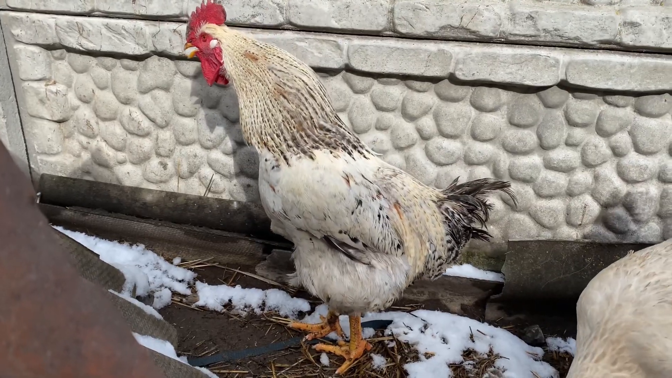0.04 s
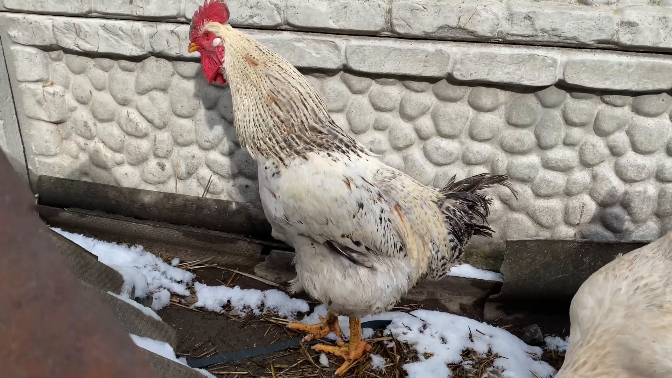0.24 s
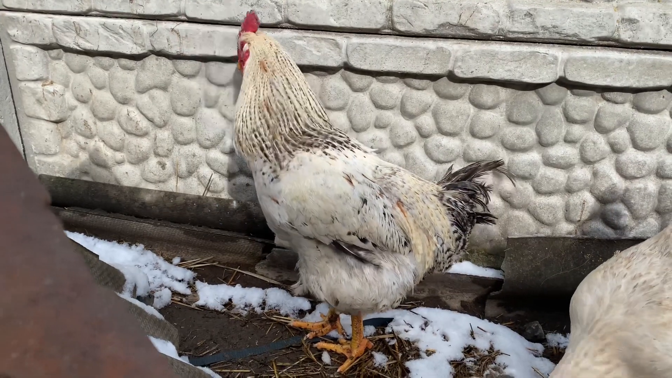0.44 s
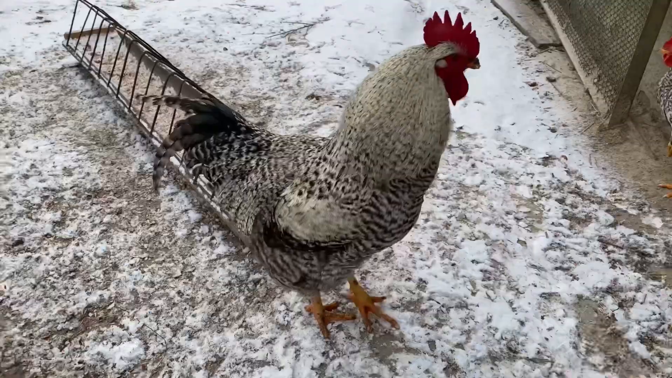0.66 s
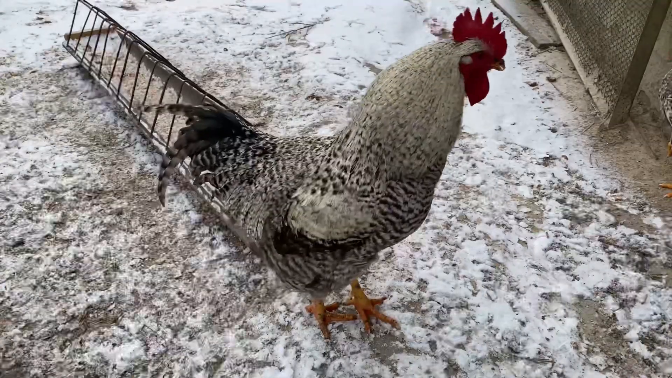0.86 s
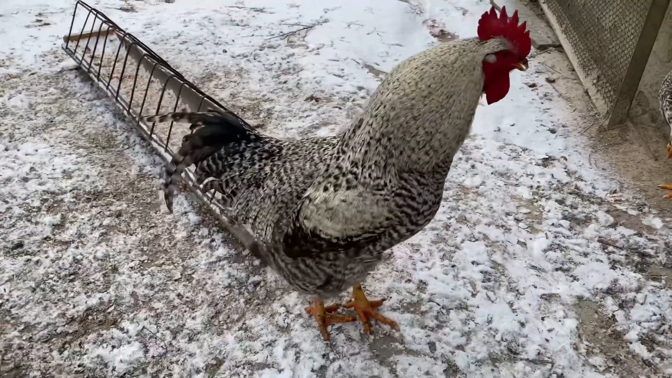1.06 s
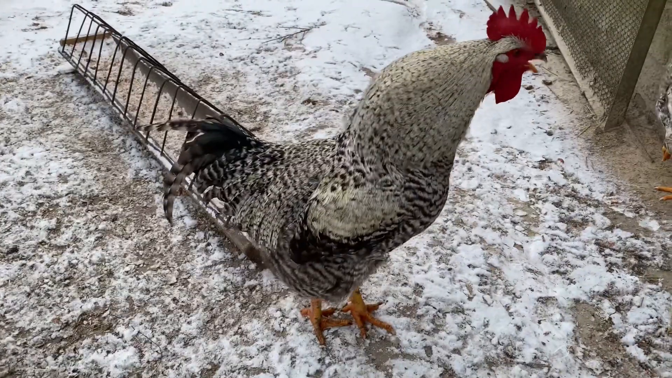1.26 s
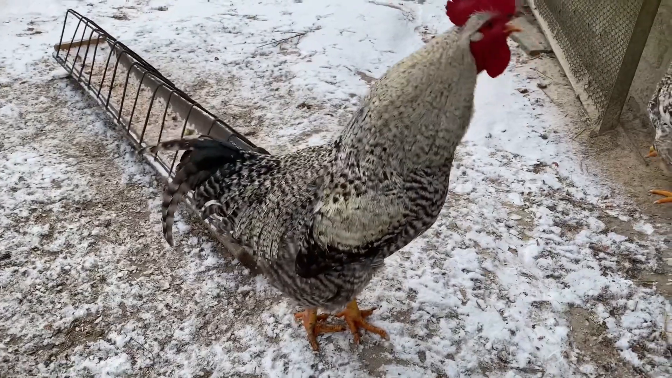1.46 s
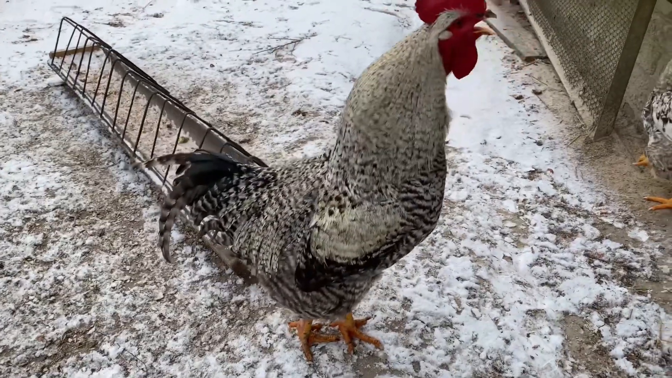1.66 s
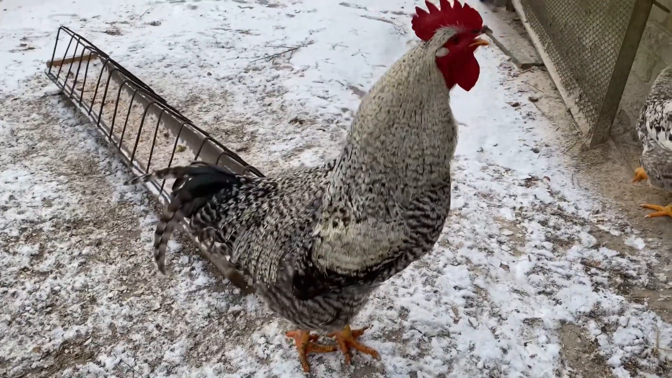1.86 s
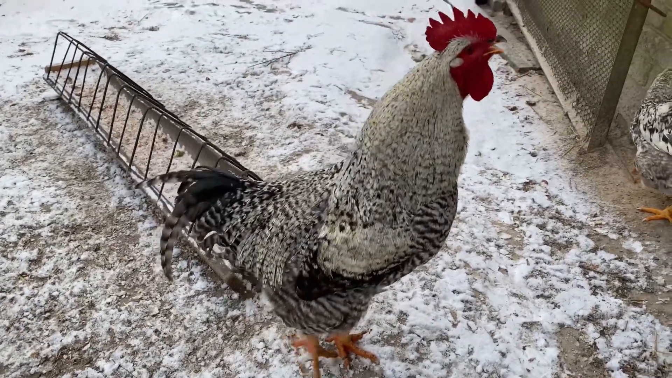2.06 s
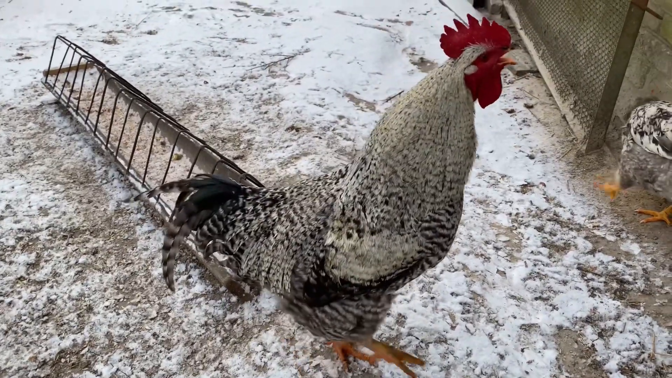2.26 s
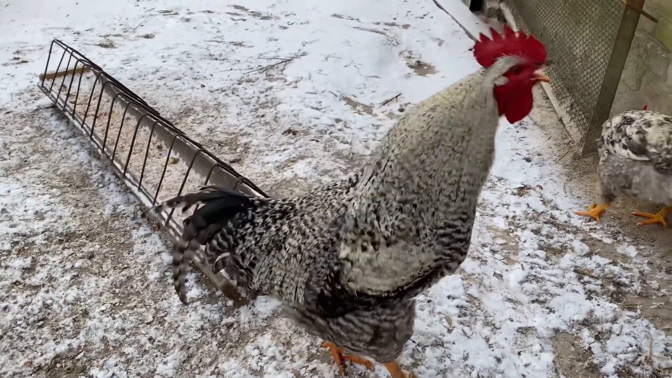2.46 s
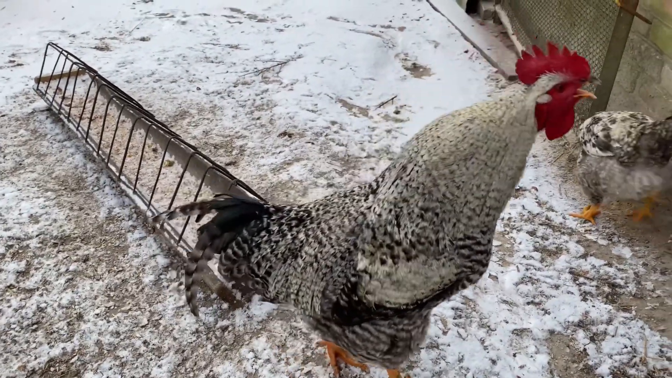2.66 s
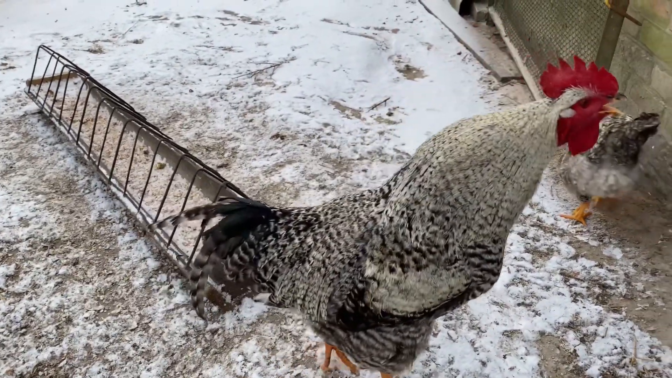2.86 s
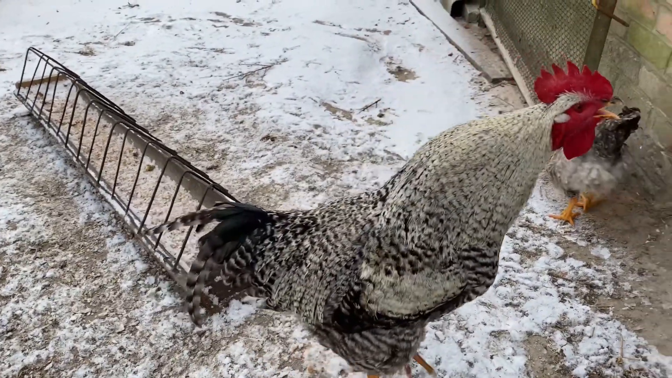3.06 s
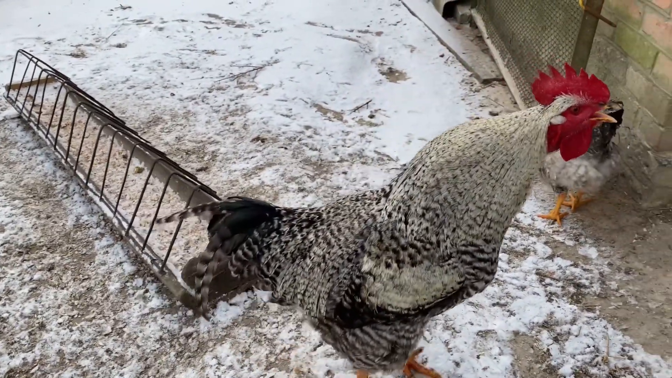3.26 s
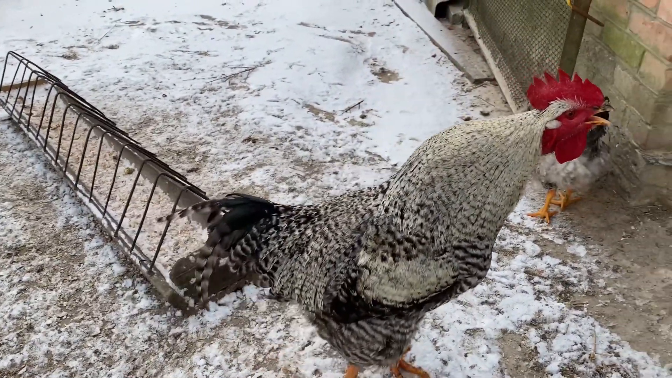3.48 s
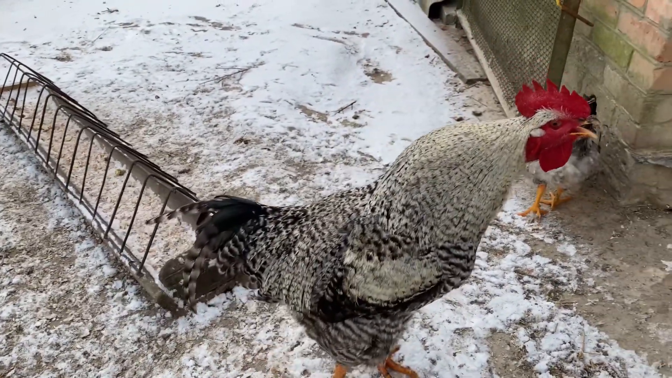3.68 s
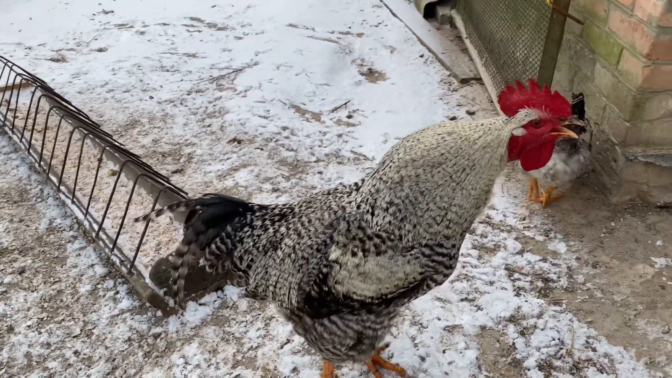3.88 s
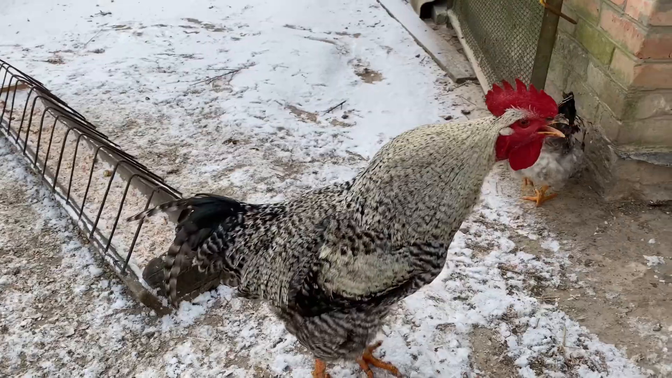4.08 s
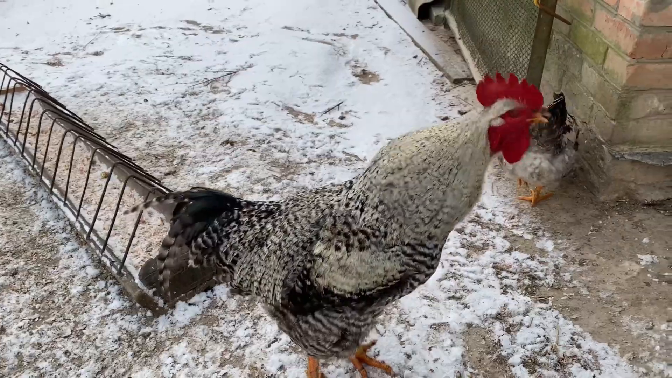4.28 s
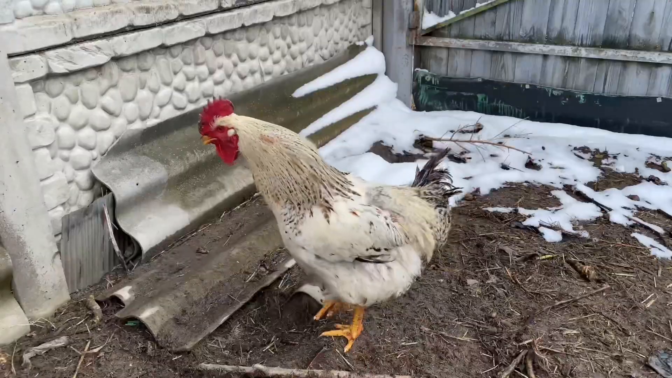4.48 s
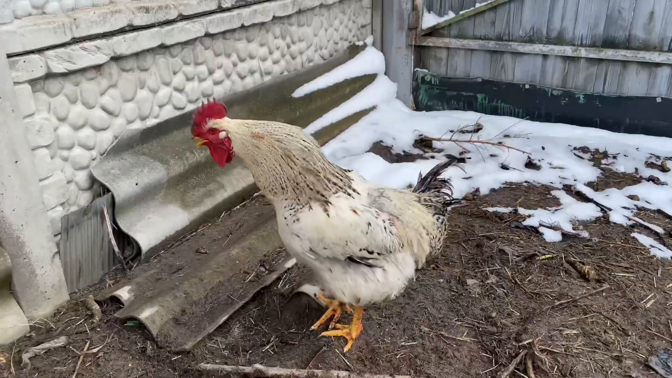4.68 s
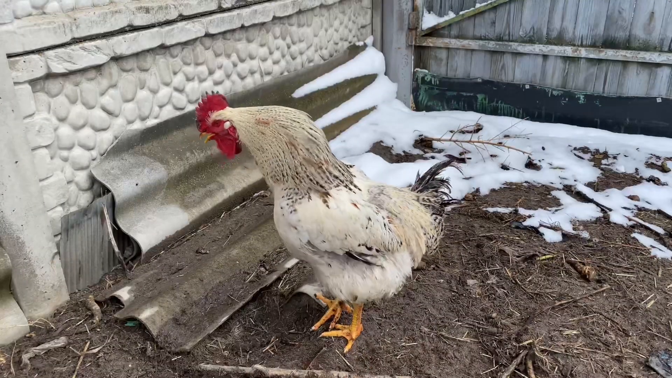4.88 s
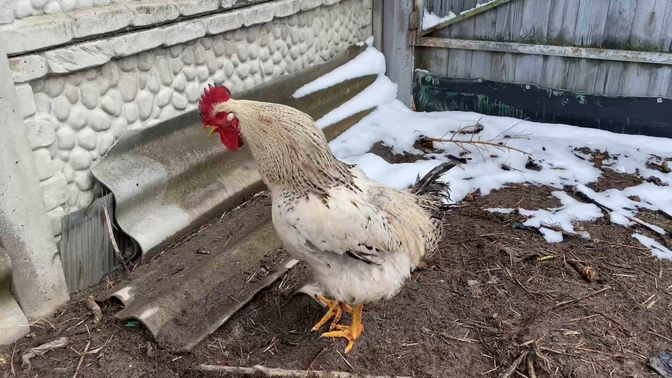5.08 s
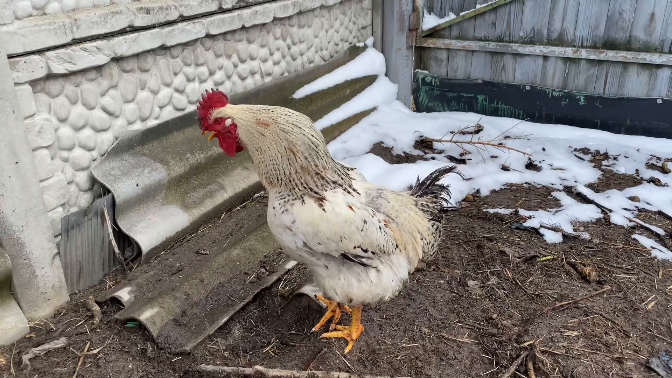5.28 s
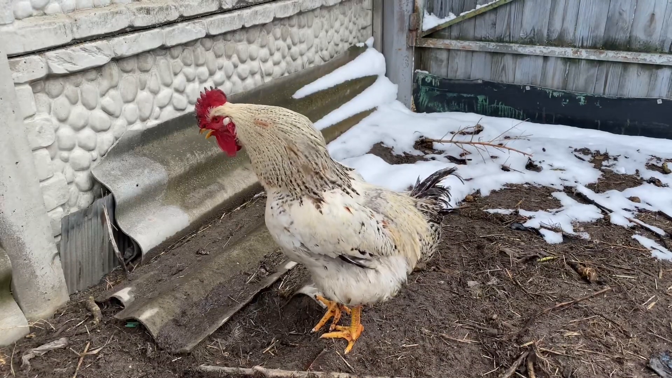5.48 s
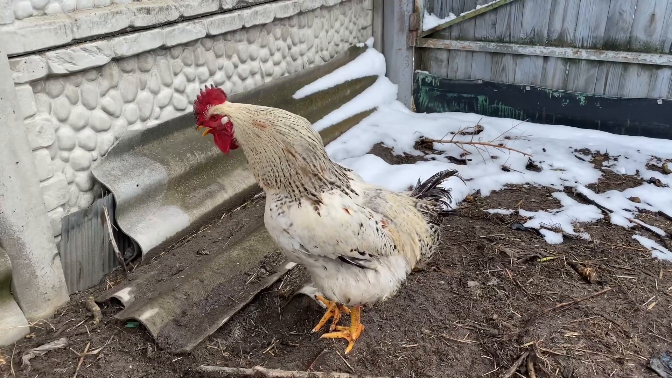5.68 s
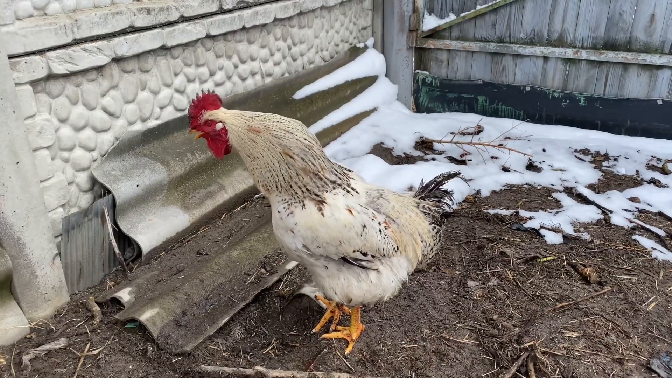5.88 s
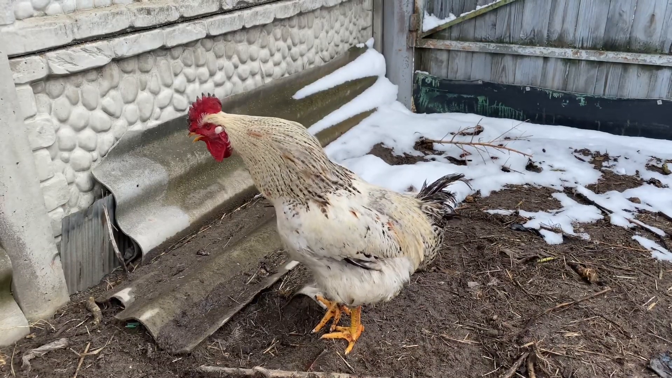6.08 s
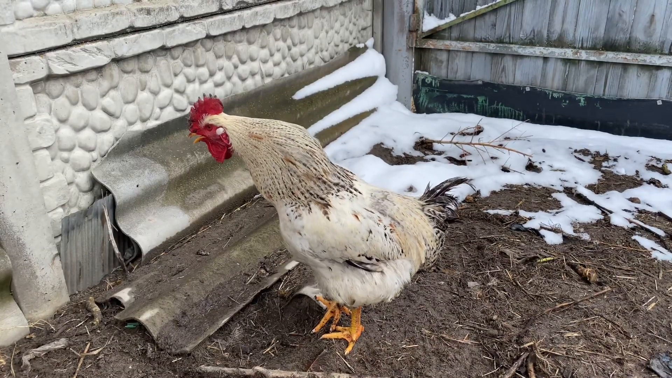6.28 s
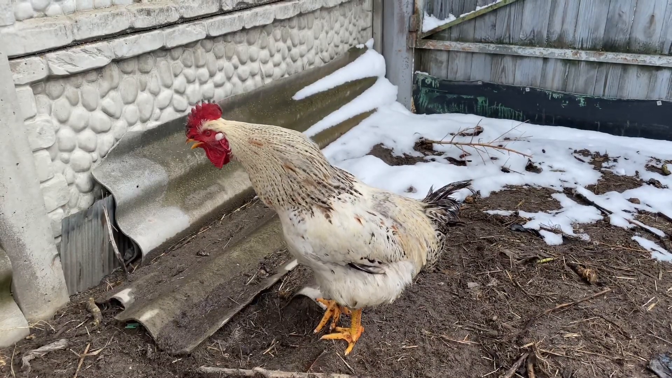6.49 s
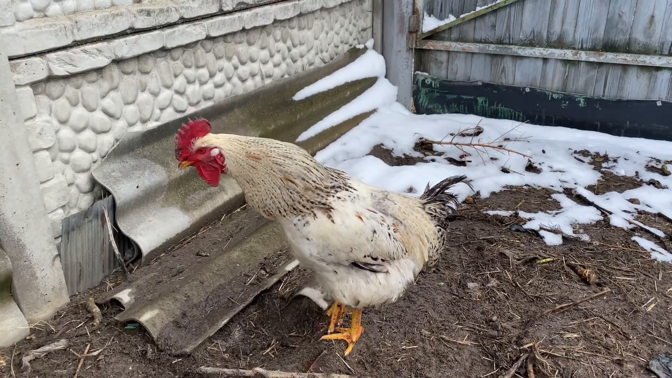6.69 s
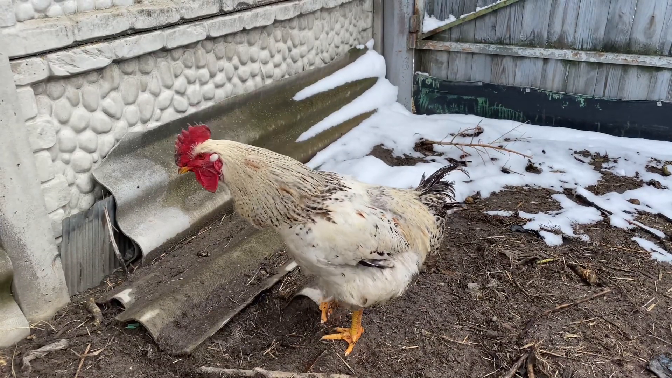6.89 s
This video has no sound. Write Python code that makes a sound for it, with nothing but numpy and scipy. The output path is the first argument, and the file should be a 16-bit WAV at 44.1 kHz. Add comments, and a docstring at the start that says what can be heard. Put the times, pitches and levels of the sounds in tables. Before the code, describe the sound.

Roosters crow in turn in a quiet snowy yard: a harsh fragment, a clear drawn-out crow that cracks lower, then a rough, broken, rasping crow.

```python
"""The rasping end of a white rooster's crow opens a snowy yard; a grey one then clucks twice and crows, its
long clear note sinking and cracking, and a white one answers with a hoarse, stuttering crow.
Each voice is a source-filter model: a pulse train and hiss from the syrinx, throat resonances, and levels
set in three bands. Echoes are scattered decaying impulses; claw scratches, the breeze rumbling on the
microphone and the hush of the village are coloured noise."""
import sys
import numpy as np
from scipy import signal
from scipy.fft import rfft, irfft, next_fast_len
from scipy.io import wavfile
from scipy.ndimage import uniform_filter1d

SR = 44100
rng = np.random.default_rng(int(sys.argv[2]) if len(sys.argv) > 2 else 0)


def store_wav(level_fs):
    """Save 16-bit WAV to argv[1]."""
    pcm = np.round(np.clip(np.atleast_2d(level_fs), -1, 1) * 32767)
    wavfile.write(sys.argv[1], SR, pcm.T.astype(np.int16))


N = 306054
TIME = np.arange(N) / SR
SIZE = next_fast_len(N + SR)   # room for the echo tail
FREQS = np.maximum(np.arange(SIZE // 2 + 1) * SR / SIZE, 1)

# the treble differs between left and right alike for every bird: (frequency [Hz], phase lead of left [rad],
# left over right [dB])
TREBLE_CHANNELS = [(8680, 4, 0.17), (10200, -0.5, 0.014), (11700, 1.5, 0.0057), (13000, -2.5, 0.23)]


def white_rooster():
    """Source-filter voice: a strongly uneven syrinx drives the throat of a hoarse bird next to a stone wall."""
    # (start [s], end [s], first pitch [Hz], last pitch [Hz], chest [dB], ring [dB], edge [dB],
    #  rasp [0-1], alternation of strong and weak beats [0-1])
    notes = [(.005, .118, 545.8, 563.7, -19.5, -22, -30, .42, .55),
             (.118, .222, 593.5, 519.7, -27.5, -29.5, -38.5, .15, .1),
             (4.645, 4.72, 527.9, 530.3, -24.5, -24, -39, .7, 0.35),
             (4.72, 4.89, 513.3, 444.3, -36, -30.5, -40.5, .25, 0.04),
             (5.058, 5.18, 544.4, 520.8, -23.5, -26, -36.5, .25, 0),
             (5.18, 5.232, 455.7, 439, -41, -35, -45, .6, .1),
             (5.232, 5.648, 468.2, 538.8, -33.5, -29.5, -40, .75, 0.11),
             (5.648, 5.86, 577.7, 541.6, -20.5, -21, -33, .85, 0.14),
             (5.86, 6.572, 545.7, 544.7, -19.5, -20, -32.5, .58, 0.46),
             (6.572, 6.668, 597, 523.5, -22.5, -29, -35.5, 0.1, 0)]
    # momentary pulls of the voice, mostly booming on the windpipe's resonance:
    # (crest [s], rise [s], fall [s], pitch [Hz], chest [dB], ring [dB], edge [dB], rasp [0-1])
    surges = [(.17, 0.01, .016, 564.6, -18, -39, -37.5, .05),
              (4.746, .06, .03, 539.3, -20, -32.5, -34, 0.3), (5.113, .03, .031, 619.7, -9, -24, -36.5, .2),
              (5.327, .042, .022, 594.1, -13.5, -23, -34.5, 0.1),
              (5.448, .032, .044, 643.3, -11.5, -22.5, -33, .27),
              (5.568, .022, .03, 634.7, -10.5, -22.5, -33, .2),
              (5.661, .012, 0.016, 586.3, -13, -22, -35.5, .25),
              (5.806, .048, .05, 501.7, -24, -33, -36, 0.01),
              (6.611, .025, 0.022, 594.3, -16.5, -25.5, -34, 0)]
    # resonances of windpipe and beak, neck relaxed: (frequency [Hz], width at -6 dB [Hz], level [dB])
    relaxed = [(628, 182, 18.5), (1200, 1300, -4), (1747, 460, -6), (3940, 800, -38.5), (4714, 530, -3),
               (6300, 1000, -14), (10400, 1400, -21.5)]
    # the same with the neck stretched: (frequency [Hz], width at -6 dB [Hz], level [dB])
    stretched = [(622, 190, -8), (853, 84, -3.5), (1275.5, 48, 12.5), (1640, 340, -17.5), (2560, 138, -6),
                 (3500, 540, -17), (5260, 730, -22), (6320, 130, -22), (8690, 1300, -28.5),
                 (9600, 4100, -33)]
    # reach of the neck: (time [s], stretch [0-1], resonance frequency ratio)
    neck = [(0, 0.98, 0.978), (.25, 1, 0.951), (4.638, .95, 1.04), (4.879, .9, 1.02), (5.061, .25, 1.041),
            (5.74, 0, 1.013), (5.87, 0.98, 1.01), (6.42, 0.99, 0.994), (6.66, 0.99, 0.92)]
    # how the ports hear this bird: (frequency [Hz], phase lead of left [rad], left over right [dB])
    ports = [(100, 1.3, -0.5), (630, 0.4, 1), (1262, 1.57, 7.5), (1760, 2.1, -3.5), (3020, 4.2, 10.5),
             (3030, 6.22, 0), (4470, 1.96, 5.5), (5230, 2.1, 4), (6980, 0.97, 0.5)]

    pitch, force_db, rasp, alternation = perform(notes, surges)
    source = syrinx(pitch, rasp, alternation, jitter=0.078, jitter_hz=129.7, shimmer_db=5.0,
                    hiss_db=4.0, waver=0.0046, wobble=.018)
    voice = throat(source, relaxed, stretched, neck, low_cut_hz=230, sway=.014)
    mirrored = near_reflections(voice, strength=1.0, sway_s=.00003)
    call = crow(mirrored, force_db, rasp, flutter_db=3.0)
    return at_ports(call, ports + TREBLE_CHANNELS) + yard(call, echo_db=-13.0, t60=0.22)


def grey_rooster():
    """Source-filter voice of a clearer bird: its resonances shift as it stretches into the long note."""
    # two soft clucks, then a crow with a faint squeak, a long clear note and a crack to a lower register:
    # (start [s], end [s], first pitch [Hz], last pitch [Hz], chest [dB], ring [dB], edge [dB],
    #  rasp [0-1], alternation of strong and weak beats [0-1])
    notes = [(1.017, 1.04, 540, 529, -33.5, -64, -70, .1, 1),
             (1.139, 1.205, 537.2, 531, -39, -74.5, -73, 0.11, 1),
             (1.287, 1.345, 523, 581, -23, -17.5, -34.5, 0.39, 0.013),
             (1.345, 1.445, 613.3, 610.4, -21.5, -13, -31, 0.08, 0),
             (1.445, 1.505, 614, 622.2, -23, -13, -29.5, 0.7, 0.23),
             (1.61, 1.65, 864.3, 831, -65.5, -46.5, -74, 0.043, 0),
             (1.671, 1.69, 536.7, 502, -34.5, -22.5, -43.5, 0.55, 0),
             (1.69, 1.81, 639.8, 679.5, -26.5, -16.5, -32, 0.48, 0),
             (1.81, 1.86, 480, 533.3, -35, -28.5, -52, 0.33, 0.24),
             (1.86, 2.11, 676.3, 652.5, -24.5, -20, -33, .52, .1),
             (2.11, 2.21, 630.6, 646, -26.5, -18.5, -36.5, 0.28, 0.0065),
             (2.21, 2.29, 637, 633, -28, -17, -33, 0.082, 0),
             (2.29, 3.02, 621, 622.4, -27.5, -18.5, -32.5, 0.024, 0.078),
             (3.02, 3.472, 621.2, 607.5, -29.5, -17.5, -31.5, 0.026, 0.048),
             (3.472, 3.57, 605.7, 600.4, -31.5, -17.5, -35.5, .09, 0.34),
             (3.57, 3.652, 594.6, 579.8, -32.5, -25.5, -41, 0.19, .18),
             (3.652, 3.98, 522.2, 475.5, -29.5, -28.5, -43, 0.059, 0.15),
             (3.98, 4.215, 470, 420.7, -32.5, -25.5, -44, 0.45, 0.22)]
    # momentary pulls of the voice, mostly booming on the windpipe's resonance:
    # (crest [s], rise [s], fall [s], pitch [Hz], chest [dB], ring [dB], edge [dB], rasp [0-1])
    surges = [(1.323, .022, .014, 534, -9.5, -18, -36, 0.27),
              (1.705, .012, .013, 529, -3.5, -19, -39, 0.39),
              (1.8, .013, 0.0033, 576, -11.5, -23, -38.5, 0.62),
              (1.854, .007, .01, 550.7, -16, -28, -39.5, .4),
              (1.938, .012, 0.01, 556.8, -19, -25.5, -40, 0.6),
              (2.003, .012, 0.011, 552, -18, -25, -38, 0.6),
              (2.169, 0.0051, 0.0074, 554, -25.5, -12.5, -34, 1)]
    # swell of the long note about its plain level: (time [s], chest [dB], ring [dB], edge [dB])
    swell = [(2.1, -0.5, -1, 0), (2.24, 5.5, -9.5, -6.5), (2.34, 4.5, 1, -7), (2.56, 1.5, 3.5, 2.5),
             (3.01, -5, 2, 3), (3.04, -5.5, -4, -4.5), (3.19, -6, -10, -5), (3.35, -4, 1.5, -6),
             (3.52, -1, 1, -1.5), (3.7, -4, -1.5, -3.5), (3.94, 4.5, -6.5, -4), (4.06, -3.5, -7.5, -8)]
    # resonances of windpipe and beak, neck relaxed: (frequency [Hz], width at -6 dB [Hz], level [dB])
    relaxed = [(607, 170, 13.5), (1030, 380, 0.5), (1250, 200, 1.5), (1598, 620, -3.5), (2649, 170, -6.5),
               (3300, 110, -11.5), (5000, 210, -11.5), (5960, 1400, -15.5), (8860, 1600, -25),
               (12400, 3900, -29.5)]
    # the same with the neck stretched: (frequency [Hz], width at -6 dB [Hz], level [dB])
    stretched = [(542, 290, -7), (1259, 150, 3.5), (1624, 95, -6), (2340, 370, -27.5), (3070, 84, -18.5),
                 (4130, 1600, -17), (4451, 92, -9.5), (5340, 470, -18.5), (8100, 1300, -32.5),
                 (8900, 2000, -31), (12400, 1800, -33.5)]
    # reach of the neck, with the resonances sagging: (time [s], stretch [0-1], resonance frequency ratio)
    neck = [(1.5, 0.93, 0.92), (1.66, 0.21, 0.96), (2.1, 0, 1), (2.401, 0.97, 1), (3.45, 1, 0.95),
            (3.72, 1, 0.93), (4.2, 1, 0.95)]
    # how the ports hear this bird: (frequency [Hz], phase lead of left [rad], left over right [dB])
    ports = [(100, -2.85, 5), (613, 0.71, -1), (1270, 1.27, -1), (1790, -3, -4), (2300, -1.94, -9),
             (3180, 2.5, -6.5), (4670, 1.3, 3.5), (5000, 2, 3), (7130, 1.27, 0.5)]

    pitch, force_db, rasp, alternation = perform(notes, surges)
    source = syrinx(pitch, rasp, alternation, jitter=0.056, jitter_hz=170, shimmer_db=6.0,
                    hiss_db=-2.0, waver=0.0019, wobble=.016)
    voice = throat(source, relaxed, stretched, neck, low_cut_hz=63, sway=0.0027)
    mirrored = near_reflections(voice, strength=0.39, sway_s=.00003)
    call = crow(mirrored, force_db + in_time(swell), rasp, flutter_db=3.5)
    return at_ports(call, ports + TREBLE_CHANNELS) + yard(call, echo_db=-11.5, t60=0.26)


def perform(notes, surges):
    """Entrainment: each surge draws pitch, levels and rasp to its own values and lets them go again."""
    level_flatness, pitch_flatness = 4.56, 1.7   # level has a flat top, pitch a pointed one
    flash_db, flash_s = 8, 0.0081   # at the crest ring and edge flare briefly
    full_flash_db = -8   # chest level that earns the full flare; softer surges flare less
    pitch, force_db, rasp, alternation = phrasing(notes)
    for crest, rise, fall, hz, chest_db, ring_db, edge_db, surge_rasp in surges:
        away = np.maximum((crest - TIME) / rise, (TIME - crest) / fall)
        away = np.minimum(away, 5)
        pull = np.exp(-away ** level_flatness)
        pitch = pitch + (hz - pitch) * np.exp(-away ** pitch_flatness)
        target_db = np.array([[chest_db], [ring_db], [edge_db]])
        force_db = force_db + (target_db - force_db) * pull
        flash_share = min(from_db(chest_db - full_flash_db), 1)
        force_db[1:] += flash_db * flash_share * pull / (1 + ((TIME - crest) / flash_s) ** 2)
        rasp = rasp + (surge_rasp - rasp) * pull
        alternation = alternation * (1 - pull)
    return pitch, force_db, np.clip(rasp, 0, 1), np.clip(alternation, 0, 1)


def phrasing(notes):
    """Pressure-driven phonation: pitch and level slacken where breath pressure builds or drains."""
    slur_s = 0.0058   # joined notes pass into each other from this long before to this long after the join
    pressure_s = .07   # breath pressure is smoothed over this time
    attack_db_per_s, release_db_per_s = 2596, 698
    slack_pitch_share, slack_rasp = .42, .9   # at full voice: pitch lost and rasp gained with no pressure
    soft_ring_db, full_ring_db = -65.5, -34.5   # soft clucks keep their pitch, calls at full voice bend
    # level lost with no pressure: (chest [dB], ring [dB], edge [dB])
    slack_db = (17.5, 9, 32)

    knots = []
    for start, end, first_hz, last_hz, *tone in notes:
        knots += [(start + slur_s, first_hz, *tone), (end - slur_s, last_hz, *tone)]
    pitch, chest, ring, edge, rasp, alternation = in_time(knots)
    fades_db = [np.maximum((start - TIME) * attack_db_per_s, (TIME - end) * release_db_per_s)
                for start, end, *_ in notes]
    fade_db = np.clip(np.min(fades_db, axis=0), 0, 200)
    slack = 1 - uniform_filter1d(from_db(-fade_db), size=int(pressure_s * SR))
    force_db = np.array([chest, ring, edge]) - fade_db - np.outer(slack_db, slack)
    effort = np.interp(ring, [soft_ring_db, full_ring_db], [0, 1])
    pitch = pitch * (1 - slack_pitch_share * effort * slack)
    # the membranes beat more unevenly as the pressure fails
    return pitch, force_db, rasp + slack_rasp * effort * slack, alternation


def syrinx(pitch, rasp, alternation, jitter, jitter_hz, shimmer_db, hiss_db, waver, wobble):
    """Self-oscillation: one pulse per membrane beat; forced membranes beat unevenly, strong and weak by turns."""
    unevenness = jitter * rasp * drift(jitter_hz) + waver * drift(24) + wobble * rasp * drift(11)
    pitch = pitch * (1 + unevenness)
    phase = 2 * np.pi * np.cumsum(pitch) / SR
    harmonics = 26   # equally strong
    half = (phase + np.pi) % (2 * np.pi) / 2 - np.pi / 2 + 1e-9
    pulses = np.sin((2 * harmonics + 1) * half) / (2 * np.sin(half)) - .5
    pulses = shaped(pulses, 1j)   # quarter-cycle shift: each beat pushes and pulls the air alike
    alternation = alternation * np.tanh((rasp / 0.1) ** 2)   # a relaxed membrane beats evenly
    pulses *= 1 + alternation * np.cos(phase / 2)
    pulses *= from_db(shimmer_db * rasp * drift(180))
    # air tears through the gap once in each beat
    hiss = rng.standard_normal(N) * (1 + np.cos(phase)) * rasp * from_db(hiss_db)
    return pulses + hiss


def throat(source, relaxed, stretched, neck, low_cut_hz, sway, leak_db=-46):
    """Tube resonance: steep peaks move with the neck, dark valleys between; a small bird radiates little bass."""
    sway_hz = 6   # how fast the resonances wander as the neck trembles
    overlap = 896
    freqs, times, frames = signal.stft(source, SR, nperseg=1024, noverlap=overlap)
    stretch, ratio = [np.interp(times, TIME, column) for column in in_time(neck)]
    stretch = np.clip(stretch, 0, 1)
    ratio = ratio * (1 + sway * np.interp(times, TIME, drift(sway_hz)))
    power = 0
    for resonances, share in ((relaxed, 1 - stretch), (stretched, stretch)):
        shape = sum(from_db(db) ** 2 / (1 + (2 * (freqs - hz) / width) ** 2) ** 2
                    for hz, width, db in resonances)
        power = power + share * np.interp(freqs[:, None] / ratio, freqs, shape)
    radiated = 1 / (1 + (low_cut_hz / (freqs[:, None] + 1)) ** 10)
    gain = np.sqrt((power + from_db(leak_db) ** 2) * radiated)
    return signal.istft(frames * gain, SR, noverlap=overlap)[1][:N]


def near_reflections(x, strength, sway_s):
    """Comb interference: nearby surfaces mirror the beamed treble; head sway makes overtones swell and fade."""
    # extra paths by way of surfaces close to the bird: (delay [s], ...)
    delays_s = (0.001129, 0.0021, 0.005)
    treble = shaped(x, 1 / (1 + (2300 / FREQS) ** 8))
    mirrored = sum(np.interp(TIME - delay - sway_s * drift(4), TIME, treble) for delay in delays_s)
    beamed = (treble + strength * mirrored) / np.sqrt(1 + len(delays_s) * strength ** 2)
    return x - treble + beamed


def crow(voice, force_db, rasp, flutter_db):
    """Vocal effort sets the spectral balance: three bands are levelled, then swell, fluttering when hoarse."""
    # chest tone below the first edge, ring of the open beak between, cutting edge above: (lower [Hz], upper [Hz])
    zone_edges_hz = (790, 2150)
    low, high = [1 / (1 + (FREQS / hz) ** 24) for hz in zone_edges_hz]
    zones = shaped(voice, np.array([low, high - low, 1 - high]))
    power = uniform_filter1d(uniform_filter1d(zones ** 2, size=600), size=400)
    levelled = zones / np.sqrt(np.abs(power) + 1e-12)
    flutter = flutter_db * np.sqrt(rasp) * np.array([drift(28), drift(35), drift(38) / 2])
    return np.sum(levelled * from_db(force_db + flutter), axis=0)


def at_ports(x, ports):
    """Two-point reception: phase and level differ between the ports while the total power is kept."""
    lead, balance_db = in_frequency(ports)
    left = from_db(balance_db / 2) * np.exp(.5j * lead)
    both = np.array([left, 1 / left])
    return shaped(x, both / np.sqrt((abs(left) ** 2 + abs(left) ** -2) / 2))


def yard(x, echo_db, t60, count=60):
    """Exponential reverberant decay: scattered echoes from walls and fences, different at each port."""
    # colour of the yard's echoes: (frequency [Hz], level [dB])
    colour = [(300, 2.5), (1200, 0.5), (4000, 6), (12000, -19)]
    response = np.zeros((2, SR))
    for side in response:
        delay = rng.uniform(.008, .35, count * 4)   # seconds
        side[(delay * SR).astype(int)] = rng.standard_normal(len(delay)) * from_db(-60 * delay / t60)
        side /= np.sqrt(np.sum(side ** 2))
    return from_db(echo_db) * shaped(x, rfft(response, SIZE) * from_db(in_frequency(colour)[0]))


def feet():
    """Friction noise: claws scratch straw and snow in faint bursts that start at once and decay exponentially."""
    # scratches: (time [s], level before the common trim [dB])
    scratches = [(0.4296, -54), (0.4667, -47), (0.5035, -51), (0.6701, -56.5), (1.1276, -54), (1.1824, -52)]
    # spectrum of a scratch: (frequency [Hz], relative level per Hz [dB])
    colour = [(500, -5.5), (2000, -5), (7000, -8.5), (14000, -9)]
    trim_db, decay_s = -9.5, 0.011
    level = 0
    for start, db in scratches:
        decay = np.exp(-np.minimum(abs(TIME - start) / decay_s, 20))
        level = level + from_db(db + trim_db) * (TIME >= start) * decay
    return level * noise(colour, apart=1)


def outdoors():
    """Turbulence noise: a lumpy low-passed breeze on the ports over the faint hush of the village."""
    # breeze: (time [s], level before the low-pass and random lumps [dB])
    breeze_level = [(0, -61), (.6, -61), (.68, -77.5), (2.0, -75), (2.4, -88), (4.33, -97), (4.42, -63),
                    (5.05, -42), (5.65, -63.5), (6.55, -65), (6.9, -53)]
    # breeze spectrum before the low-pass: (frequency [Hz], relative level per Hz [dB])
    breeze_colour = [(25, -10.5), (80, -2.5), (200, -14), (500, -39)]
    # hush: (time [s], level [dB])
    air_level = [(.55, -70), (.68, -71), (4.3, -80), (4.42, -71)]
    # hush spectrum: (frequency [Hz], relative level per Hz [dB])
    air_colour = [(200, 0), (1500, -10.5), (5000, -18), (15000, -35)]
    breeze = shaped(noise(breeze_colour, apart=0.24), 1 / (1 + (FREQS / 450) ** 4))
    breeze *= from_db(in_time(breeze_level)[0] + 2.0 * drift(6.4))
    hush = noise(air_colour, apart=3.2) * from_db(in_time(air_level)[0])
    return breeze + hush


def noise(colour, apart):
    """Partial coherence: coloured noise made of a part shared by the ports and a part of each one's own."""
    white = rng.standard_normal(N) + apart * rng.standard_normal((2, N))
    return rms_one(shaped(white, from_db(in_frequency(colour)[0])))


def drift(rate_hz):
    """Low-passed random process: wandering of spread 1, mostly slower than the given rate."""
    return rms_one(shaped(rng.standard_normal(N), 1 / (1 + (FREQS / rate_hz) ** 4)))


def shaped(x, response):
    """Linear filtering: multiply the spectrum by a frequency response."""
    return irfft(rfft(x, SIZE) * response, SIZE)[..., :N]


def in_time(rows):
    """Linear interpolation: columns of a curve at every sample."""
    s, *columns = np.transpose(rows)
    return [np.interp(TIME, np.sort(s), c) for c in columns]


def in_frequency(rows):
    """Interpolation on a logarithmic frequency axis: columns of a spectrum at every frequency."""
    hz, *columns = np.transpose(rows)
    return [np.interp(np.log(FREQS), np.log(hz), c) for c in columns]


def from_db(db):
    """Logarithmic level: decibels to amplitude gain."""
    return 10 ** (np.asarray(db) / 20)


def rms_one(x):
    """Power normalisation: scale to unit mean square."""
    return x / np.sqrt(np.mean(x ** 2) + 1e-20)


def scene():
    """Superposition: crows in turn, white, grey, white, with scratching feet and the outdoor background."""
    return white_rooster() + grey_rooster() + feet() + outdoors()


def record(dry):
    """Saturation and band-limiting: peaks are rounded off, deep bass thinned and the top cut steeply."""
    cutoff_hz = 15800
    rounded = dry / (1 + (dry / .93) ** 8) ** (1 / 8)
    thinned = signal.sosfilt(signal.butter(2, 40, "high", fs=SR, output="sos"), rounded)
    return signal.sosfilt(signal.ellip(10, .2, 90, cutoff_hz, fs=SR, output="sos"), thinned)


dry = scene()
out = record(dry)
store_wav(out)
```